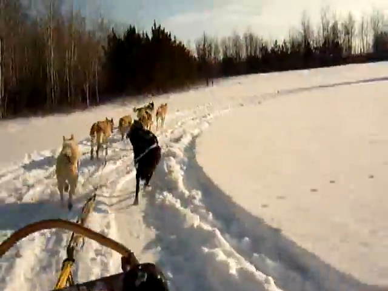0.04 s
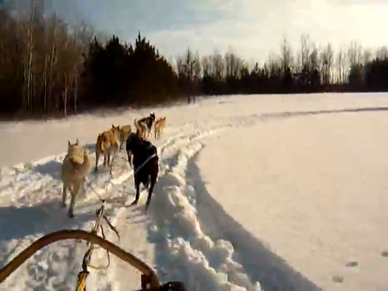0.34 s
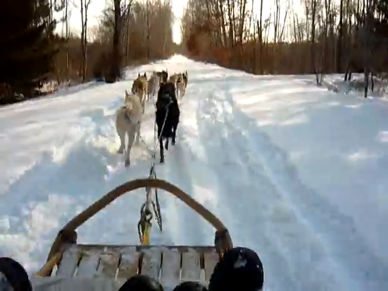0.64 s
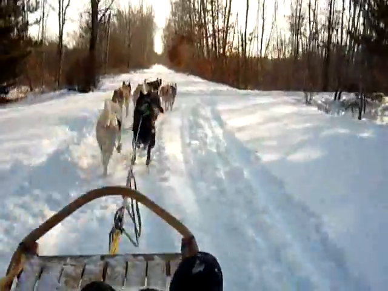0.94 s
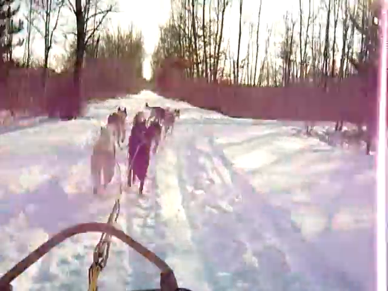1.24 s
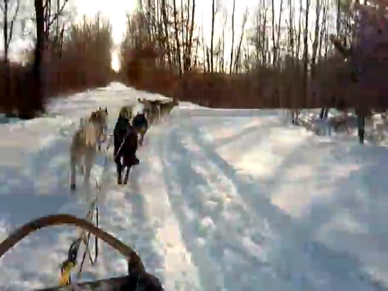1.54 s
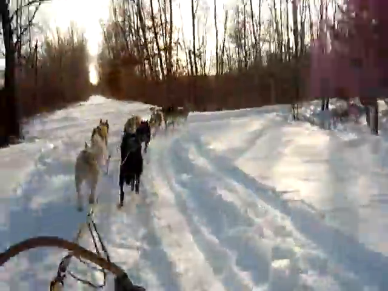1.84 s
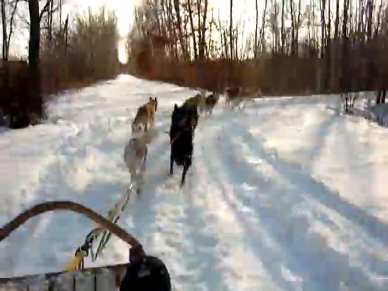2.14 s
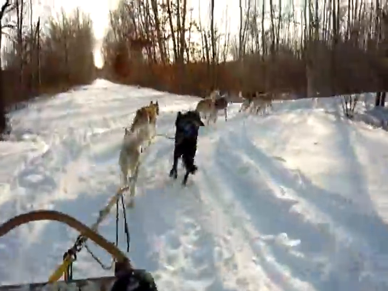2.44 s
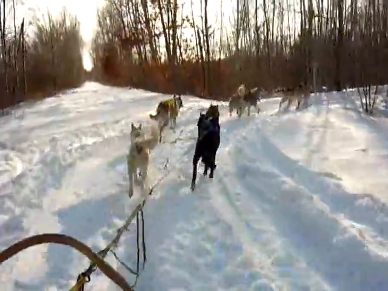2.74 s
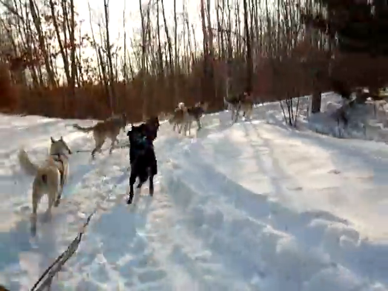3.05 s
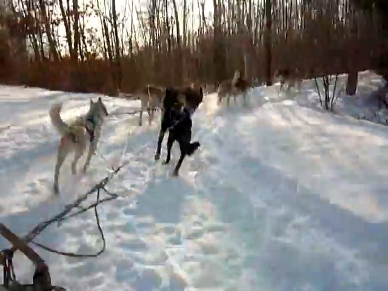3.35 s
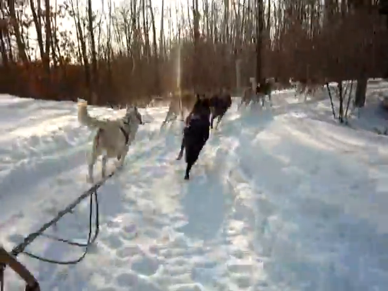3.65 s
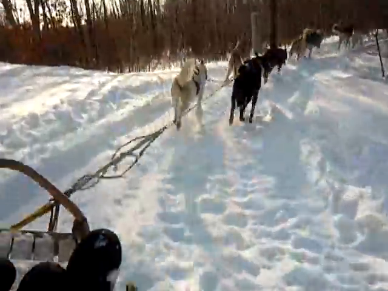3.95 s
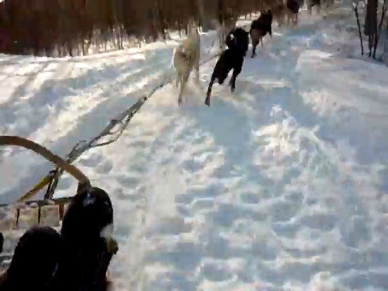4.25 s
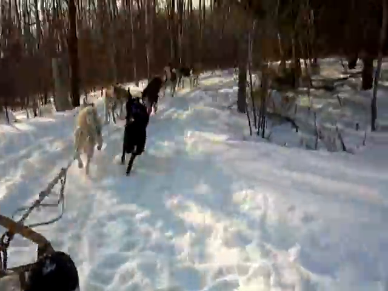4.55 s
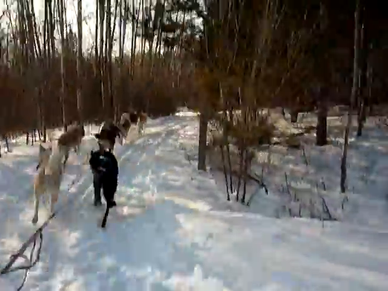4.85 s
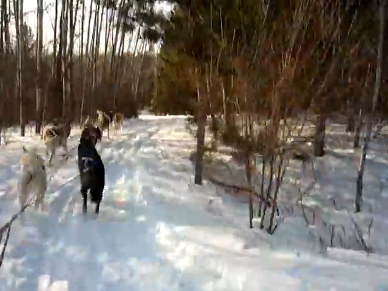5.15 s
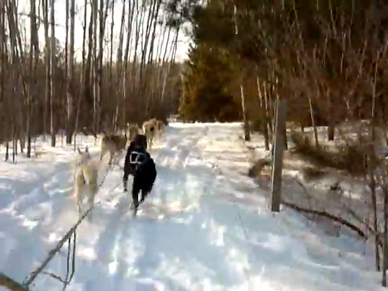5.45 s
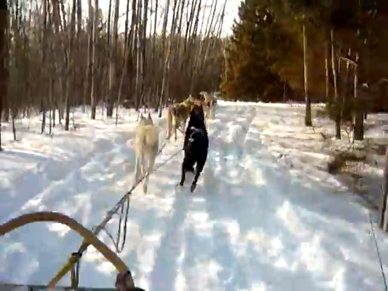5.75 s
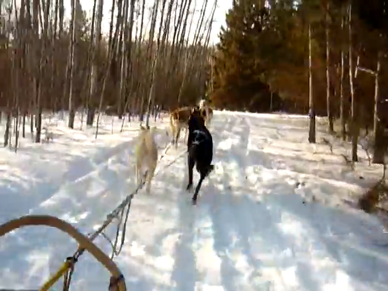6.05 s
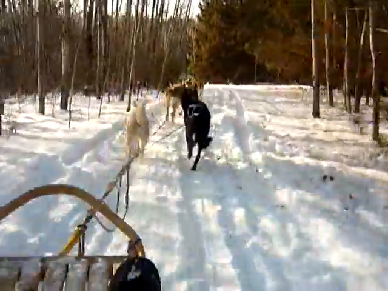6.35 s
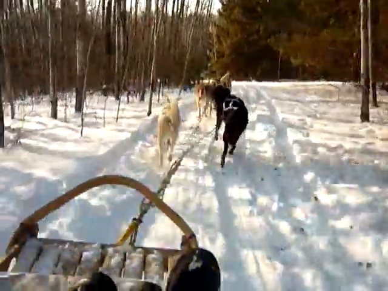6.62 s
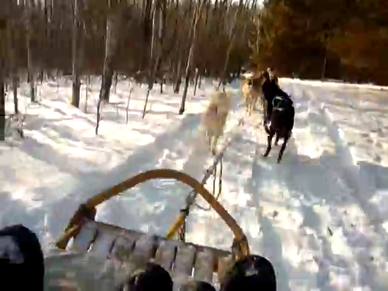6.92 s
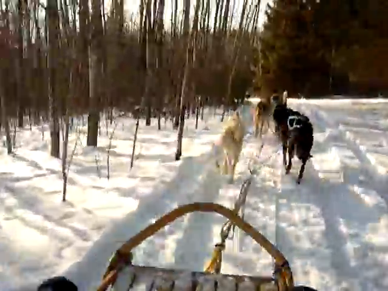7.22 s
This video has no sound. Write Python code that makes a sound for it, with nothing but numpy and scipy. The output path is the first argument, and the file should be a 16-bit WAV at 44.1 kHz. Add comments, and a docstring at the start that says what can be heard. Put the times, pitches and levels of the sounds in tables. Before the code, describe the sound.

Gusty wind buffets the microphone on a moving dog sled, with runners hissing on snow, bumps over ruts and one sharp click.

```python
"""Dog sled in a head wind

A sled runs along packed snow, heard from a small camera riding on it. Eddies sweep over the microphone:
slow air thumps and flutters, fast air tears and rasps, and gusts and lulls pass over a low rumble.
Underneath, the runners hiss and swish and the sled thuds over ruts.
One sharp click overloads the recorder."""
import sys
import numpy as np
from scipy import signal
from scipy.fft import rfft, irfft
from scipy.io import wavfile
from scipy.ndimage import uniform_filter1d, map_coordinates

SR = 44100
rng = np.random.default_rng(int(sys.argv[2]) if len(sys.argv) > 2 else 0)


def to_wav(sig):
    """Store sig (one row per channel, or 1-D mono) as 16-bit WAV at the path in sys.argv[1].

    Samples outside -1..1 are clipped; the rate is SR.
    """
    pcm = np.clip(np.atleast_2d(sig), -1, 1) * 32767
    pcm = np.round(pcm).astype(np.int16)
    wavfile.write(sys.argv[1], SR, pcm.T)  # frames by channels


N = 325458
TIME = np.arange(N) / SR

# tone of the microphone port: (frequency [Hz], gain [dB])
MIC_PORT = [(20, -27), (40, -27.5), (70, -19), (110, -7.5), (180, -0.5), (300, 2), (480, 1.44), (800, 1.43),
            (1300, 1.3), (2000, 0.73), (3000, 0.5), (5000, -6)]


def wind(surge_db=0.96, surge_hz=120, flutter_db=0.24, flutter_hz=60,
         wander_db=0.33, sway_db=0.39, drift_hz=12, trim_db=-0.12):
    """Turbulence on the microphone; brief surges make it brighter and louder together."""
    # bed of head wind: (time [s], level [dB], eddy rate [Hz])
    head_wind = [(0, -29, 100.1), (.27, -32.5, 62.21), (.42, -19.5, 165.5), (.66, -17.5, 145.1),
                 (.85, -18.5, 139.8), (.91, -18, 378.6), (1.45, -18.5, 267.5), (2.25, -17.5, 258.1),
                 (2.9, -18, 237.6), (3.4, -18, 289.8), (3.65, -17.5, 284.1), (3.9, -19, 345.3),
                 (4.45, -20.5, 285.1), (4.7, -20, 275.7), (5.55, -19, 234.7), (5.68, -18.5, 215),
                 (5.76, -19, 299.7), (6.05, -20, 280.4), (6.45, -19.5, 254.3), (6.85, -20.5, 194.9),
                 (7.1, -24.5, 165.2), (7.28, -19.5, 304.4)]
    # gusts, fast and bright or slow and heavy: (time [s], length [s], speed gain [dB], level gain [dB])
    gusts = [(.095, 0.052, -3, 10.5), (.182, 0.045, 3, 11.5), (.255, .05, -2, 11), (.33, 0.054, -3, 1),
             (.45, .07, 1.5, 3), (.915, 0.062, 2, -0.5), (1.25, 0.049, 2, 0), (1.65, .05, 2, -2),
             (1.76, 0.058, 1.5, -1), (1.95, 0.05, 2, 1.5), (2.26, .03, 2.5, 0), (2.36, .07, 2.5, 0),
             (2.79, 0.053, 2, -0.5), (3.058, .035, 5, -0.5), (3.335, .024, 4.5, 0),
             (3.95, 0.049, 3.5, -1.5), (4.2, 0.098, 3, 1.5), (4.315, 0.031, 4.5, -3), (4.68, .03, 4, 0.5),
             (4.94, 0.047, 2, 0.5), (5.3, 0.094, -1, 2.5), (5.385, 0.062, 2.5, 2.5), (5.437, .025, 4.5, -1),
             (5.765, 0.04, 5.5, -1), (5.832, .04, 4.5, -1.5), (5.99, 0.037, 2, 0), (6.33, 0.062, 2, -2),
             (6.42, 0.058, 2.5, 0), (6.565, 0.039, 3, -2), (6.76, 0.046, 1, -1), (6.9, 0.068, -1, 0),
             (7.163, 0.029, -1.5, 1), (7.34, 0.079, 1, -0.5)]
    # lulls where the air slackens: (time [s], length [s], speed loss [dB], level loss [dB])
    lulls = [(.135, 0.067, 0, 4), (.215, 0.03, 0, 0), (.565, .03, 3, -1), (.655, 0.053, 0, 3.5),
             (.715, 0.073, 6, 3.5), (1.315, 0.05, 2.5, 7), (1.89, 0.05, 4.5, -1), (2.108, 0.064, 10, -1.5),
             (2.232, 0.037, 4, -1.5), (2.68, .04, 4.5, 0.5), (3.01, 0.038, 1.5, 0.5),
             (3.245, 0.045, 4.5, 1), (3.515, 0.057, 3, 0.5), (3.775, 0.026, 1, 7.5),
             (4.005, 0.049, 8.5, -1), (4.05, .045, 4, 6), (4.1, .02, 4, 1.5), (4.283, 0.052, 6.5, -4.5),
             (4.352, 0.035, 6, 2), (4.517, 0.04, 6.5, 8), (4.76, .06, 1.5, -1), (4.855, 0.06, 3, -2),
             (5.02, 0.081, 3.5, -0.5), (5.115, 0.06, 6.5, 2.5), (5.175, 0.078, 3.5, 2.5),
             (5.58, 0.061, 3.5, -1.5), (5.65, 0.099, 3, 0), (5.792, 0.03, 4.5, 0), (5.915, 0.031, 2.5, 1),
             (6.14, .06, 2, 0), (6.21, 0.092, 8, 1), (6.485, 0.083, 4.5, -2), (6.6, 0.051, 2, 0),
             (6.715, 0.069, 6, 1.5), (6.835, 0.041, 2.5, 2.5), (7.015, 0.091, 3, 1.5),
             (7.085, 0.049, 2.5, 1), (7.192, 0.038, 7, 3)]
    level_db, eddy_hz = curves(head_wind)
    gust_speed_db, gust_db = swells(gusts)
    lull_speed_db, lull_db = swells(lulls)
    front_db = gust_fronts()
    surging_db = surge_db * walk(surge_hz)
    speed_db = gust_speed_db - lull_speed_db + .35 * front_db + surging_db + wander_db * walk(drift_hz)
    pressure = eddies(eddy_hz * undb(speed_db))
    pressure *= undb(surging_db + flutter_db * walk(flutter_hz))
    # even out the texture so that the gusts shape its loudness
    texture = steady(colour(pressure, MIC_PORT), even_s=0.026)
    strength_db = level_db + gust_db - lull_db + front_db + sway_db * walk(drift_hz)
    return texture * undb(strength_db + trim_db)


def eddies(eddy_hz, slope=0.44):
    """A frozen pattern of vortices blows past the port: the faster it passes, the brighter it sounds."""
    # vortices in the stream: (relative width, count per eddy period, level [dB])
    vortex_mix = [(1.624, 2.6, -2), (1.16, 1.5, -6.5), (0.61, .27, -19)]
    size, steps_per_period = 2 ** 18, 64
    wavenumber = np.fft.rfftfreq(size, 1 / steps_per_period)
    pattern = np.zeros(size)
    for width, density, db in vortex_mix:
        present = rng.random(size) < density / steps_per_period
        # a vortex gives a push, a pull or a swing, depending on how it passes
        cores = present * np.exp(2j * np.pi * rng.random(size))
        spectrum = rfft(cores.real) + 1j * rfft(cores.imag)
        # its smooth core rolls the highs off exponentially
        core_tone = wavenumber ** slope * np.exp(-wavenumber * width / 2)
        pattern += undb(db) * unit(irfft(spectrum * core_tone))
    travelled = np.cumsum(eddy_hz) * steps_per_period / SR
    return map_coordinates(pattern, [travelled % (size - 1)], order=3, mode="wrap")


def gust_fronts(stall_s=.015, rush_s=.012, overshoot=.5):
    """Swing of the wind in dB: the air stalls before each front, then snaps back and overshoots."""
    # gust fronts: (time [s], stall depth [dB])
    stalls = [(.893, 3.5), (1.934, 7), (2.72, 4.5), (2.921, 7.5), (3.159, 6), (3.327, 6), (3.474, 6),
              (3.733, 5), (3.788, 6), (4.111, 4.5), (4.305, 5.5), (4.533, 9), (4.609, 9.5), (4.876, 8),
              (5.471, 6), (5.886, 5), (6.315, 7.5), (6.486, 6), (6.55, 7), (6.745, 6), (7.227, 4)]
    swing_db = np.zeros(N)
    for s, depth_db in stalls:
        near = np.abs(TIME - s) < .1
        age = TIME[near] - s
        stall = -np.exp(-np.abs(age) / stall_s)
        rush = overshoot * np.exp(-np.abs(age) / rush_s)
        swing_db[near] += depth_db * np.where(age < 0, stall, rush)
    return uniform_filter1d(swing_db, size=64)


def buffets(gain_db=1.5):
    """Each strong eddy hits the microphone with one pressure swing: slow ones thump, fast ones crack."""
    # single strong eddies: (time [s], relative level [dB], eddy rate [Hz])
    hits = [(0.083, -14.5, 120.3), (0.098, -14, 109), (.185, -11, 171), (.333, -12.5, 95), (.405, 0, 199.5),
            (.423, -4, 171), (.431, -6.5, 159), (.551, -3.5, 199), (.586, -8, 210), (.595, -6.5, 250),
            (.626, -3, 156.5), (.666, -9.5, 191), (.722, -7, 138), (.760, -5.5, 211), (.781, -7.5, 290),
            (.816, -7.5, 236), (.863, -9, 190), (.885, -3.5, 327), (.975, -16.5, 700),
            (1.095, -10.5, 689.3), (1.290, -9.5, 600), (1.312, -9, 177.6), (1.366, -11, 750),
            (1.402, -9.5, 570), (1.468, -10, 478), (1.521, -14, 528.6), (1.573, -7, 388),
            (1.739, -9.5, 806), (1.803, -9.5, 800), (1.816, -5, 464.3), (1.867, -5.5, 430),
            (1.967, -15, 416.4), (2.070, -16.5, 420.3), (2.163, -12.5, 380), (2.203, -15.5, 647),
            (2.391, -4.5, 277), (2.515, -10.5, 630), (2.654, -9, 486), (2.706, -7.5, 500),
            (2.723, -7.5, 340), (2.882, -14.5, 690), (2.943, -17.5, 575.2), (3.067, -7, 544),
            (3.134, -12, 599), (3.16, -6, 431), (3.222, -9.5, 525), (3.272, -15.5, 801), (3.305, -7.5, 587),
            (3.333, -10, 520), (3.358, -9, 413), (3.400, -15, 467.3), (3.451, -3, 370), (3.638, -10, 433),
            (3.766, -10.5, 542), (3.801, -4.5, 433), (3.868, -13, 437), (3.936, -6, 493),
            (4.120, -5.5, 318.1), (4.143, -21, 779.7), (4.306, -5.5, 348.2), (4.610, -8.5, 199.5),
            (4.646, -15.5, 530), (4.692, -6, 584), (4.808, -8.5, 337), (4.861, -11.5, 450),
            (4.964, -9, 332), (5.302, -6, 243), (5.369, -12, 380.5), (5.433, -8, 485.1), (5.598, -11, 340),
            (5.686, -6, 226), (5.81, -4.5, 259), (5.832, -14.5, 800), (5.866, -7, 360), (5.888, -11.5, 370),
            (5.935, -8, 443.8), (5.99, -10, 401.8), (6.051, -8.5, 432), (6.094, -7, 492),
            (6.260, -11.5, 494.6), (6.377, -17.5, 480), (6.556, -12, 416), (6.675, -3.5, 220),
            (6.752, -6.5, 209), (6.773, -11, 230), (6.812, -8.5, 192), (6.87, -12.5, 534), (6.893, -7, 172),
            (6.935, -15.5, 350.1), (6.950, -18, 229), (6.968, -12.5, 310.6), (7.047, -14, 292),
            (7.122, -11, 180), (7.148, -11, 188), (7.166, -9, 340), (7.23, -7.5, 430), (7.302, -2, 414),
            (7.345, -7, 565)]
    pressure = np.zeros(N)
    for (s, db, eddy_hz), phase in zip(hits, rng.uniform(0, 2 * np.pi, len(hits))):
        near = np.abs(TIME - s) < .04
        distance = 2 * np.pi * eddy_hz * (TIME[near] - s)
        swing = np.real(np.exp(1j * phase) / (1 - 2j * distance) ** 1.21)
        pressure[near] += undb(db + gain_db) * swing
    return colour(pressure, MIC_PORT)


def rut_thuds(swell_s=0.0029):
    """Snow cushions each jolt over a rut, so the frame swells into a few swings and stops."""
    # low thuds and wooden knocks: (time [s], peak level [dB], pitch [Hz])
    jolts = [(0.088, -13.5, 150.4), (0.304, -14, 170), (.324, -9.5, 125), (.329, -20.5, 713),
             (.338, -32, 690), (.378, -17, 232), (0.429, -18, 270), (0.53, -18, 330), (.541, -13, 560),
             (.717, -8, 199.6), (.752, -10.5, 149.3), (0.81, -9, 209.1), (.859, -12, 205.3),
             (1.331, -6.5, 204.5), (1.365, -17, 148.1), (1.492, -14, 170), (1.923, -11, 199.1),
             (2.155, -10, 188), (2.226, -11, 197), (2.501, -12.5, 134.5), (2.52, -19, 280.6),
             (2.599, -15, 292), (3.645, -15, 290), (3.732, -14, 671), (4.011, -15, 616),
             (4.476, -13, 705.5), (5.055, -14, 278.5), (5.328, -16, 270), (5.515, -18.5, 140),
             (5.578, -13.5, 220.2), (5.652, -11, 280.9), (6.263, -12, 258.5), (6.318, -17, 290),
             (6.515, -11, 185.2), (6.550, -12.5, 678.5), (6.747, -12.5, 330.4), (6.795, -11, 297.8),
             (6.907, -8.5, 179.1), (6.944, -18, 189.8), (7.118, -12, 212.2), (7.161, -6, 225.4),
             (7.226, -7.5, 189.9)]
    track = np.zeros(N)
    age = np.arange(SR // 10) / SR
    envelope = age / swell_s * np.exp(1 - age / swell_s)
    for (s, db, hz), phase in zip(jolts, rng.uniform(0, 2 * np.pi, len(jolts))):
        start = int(s * SR)
        thud = undb(db) * envelope * np.sin(2 * np.pi * hz * age + phase)
        track[start:start + len(age)] += thud[:N - start]
    return track


def click(at_s=.5227, rise_s=0.0001):
    """A sharp click that the recorder clips, gone within a few milliseconds."""
    # brief ring of the click: (frequency [Hz], level [dB], decay [s])
    modes = [(89, 0.5, 0.0035), (330, 5, 0.00217), (490, 4.5, 0.0018), (732, 5, 0.0014),
             (1360, 9, 0.000525), (2260, -23, 0.0025)]
    age = np.maximum(TIME - at_s, 0)
    ring = sum(undb(db) * np.exp(-age / decay_s) * np.cos(2 * np.pi * hz * age)
               for hz, db, decay_s in modes)
    attack = 1 - np.exp(-age / rise_s)
    return -ring * attack


def camera_rumble(trim_db=-2.5):
    """Wind shakes the camera: a low, unbroken shudder under the gusts."""
    # strength of the shaking: (time [s], relative level [dB])
    shaking = [(0, -33), (.09, -24.5), (.24, -37), (.29, -26), (.33, -17), (.38, -25), (.42, -22),
               (.48, -38), (.52, -23), (.61, -30), (.69, -35), (.76, -25), (.84, -27), (.94, -38),
               (1.02, -31), (1.13, -42), (1.33, -28), (1.5, -24.5), (1.62, -34), (1.75, -39), (1.83, -31),
               (2.24, -29.5), (2.33, -41), (2.5, -30), (2.63, -39), (2.71, -25), (2.79, -37), (3.04, -28),
               (3.23, -31), (3.35, -44), (3.59, -28.5), (3.7, -33), (4.4, -38), (4.6, -32), (4.8, -39),
               (5.17, -38), (5.28, -27.5), (5.62, -38), (5.74, -36), (6.12, -42), (6.26, -30), (6.5, -35.5),
               (6.77, -30), (6.96, -29), (7.07, -39), (7.16, -27), (7.38, -40)]
    # tone of the shudder: (frequency [Hz], gain [dB])
    bass_tone = [(20, -15.5), (45, -12), (70, -3), (100, 0), (130, 0.5), (170, -16.5), (300, -48.5)]
    level_db, = curves(shaking)
    shudder = steady(colour(rng.standard_normal(N), bass_tone), even_s=.04)
    return shudder * undb(level_db + trim_db)


def runners(grains_per_s=700, crunch=0.87, uneven_db=0.76, uneven_hz=20, frame_db=5):
    """Snow crystals crush under the runners in a dense hiss, and the frame rumbles along."""
    # glide of the runners: (time [s], level [dB])
    glide = [(0, -42.5), (.3, -43), (.45, -43), (.65, -40.5), (.85, -42), (1.4, -42.5), (1.8, -40),
             (2.1, -43.5), (3, -40.5), (4, -46), (5.3, -43.5), (7.38, -43.5)]
    # swishes of loose snow: (time [s], length [s], gain [dB])
    swishes = [(.035, 0.065, 4.5), (.16, 0.099, 5), (.32, .08, 4.5), (.725, .1, 3.5), (.925, 0.036, 8),
               (1.25, 0.061, 4), (3.34, .05, 4), (3.655, 0.039, 12), (3.8, .05, 7), (3.94, 0.039, 2)]
    # tone of the snow hiss: (frequency [Hz], gain [dB])
    snow_tone = [(300, 5), (800, 11), (1400, 3.5), (2100, -0.5), (2900, -1.5), (3600, 1), (4400, -3.5),
                 (5200, -11), (7000, -40)]
    # tone of the sled frame: (frequency [Hz], gain [dB])
    frame_tone = [(25, -19.5), (60, -13.5), (130, -9), (260, -2), (500, 2), (1000, -17), (2000, -47.5)]
    level_db, = curves(glide)
    swish_db, = swells(swishes)
    grains = (rng.random(N) < grains_per_s / SR) * rng.standard_normal(N)
    hiss = unit(colour(rng.standard_normal(N) + crunch * unit(grains), snow_tone))
    frame = unit(colour(rng.standard_normal(N), frame_tone))
    hiss *= undb(swish_db + uneven_db * walk(uneven_hz))
    return (hiss + frame * undb(frame_db)) * undb(level_db)


def undb(db):
    """Decibels to gain."""
    return 10 ** (np.asarray(db) / 20)


def unit(x):
    """Scale to rms 1."""
    return x / np.sqrt(np.mean(x ** 2))


def steady(x, even_s):
    """Ride the rms towards 1 over stretches of even_s, keeping the fine flutter."""
    size = max(int(even_s * SR), 64)
    power = uniform_filter1d(uniform_filter1d(x ** 2, size), size)
    return x / np.sqrt(np.abs(power) + 1e-18)


def curves(table):
    """Straight-line automation from rows of (time [s], values), one curve per value column."""
    s, *columns = np.transpose(table)
    return [np.interp(TIME, s, column) for column in columns]


def swells(table, edge=2.4):
    """Smooth bells from rows of (time [s], length [s], heights [dB]), one curve per height column."""
    return sum(np.outer(heights_db, np.exp(-(edge * (TIME - s) / length_s) ** 2))
               for s, length_s, *heights_db in table)


def colour(x, points):
    """Equalise along a curve of (frequency [Hz], gain [dB]) points."""
    hz, db = np.transpose(points)
    bin_hz = np.maximum(np.fft.rfftfreq(N, 1 / SR), 1)
    gain_db = np.interp(np.log(bin_hz), np.log(hz), db)
    return irfft(rfft(x) * undb(gain_db), N)


def walk(rate_hz):
    """Smooth random drift of rms 1, rolled off above rate_hz."""
    bin_hz = np.fft.rfftfreq(N, 1 / SR)
    return unit(irfft(rfft(rng.standard_normal(N)) / (1 + (bin_hz / rate_hz) ** 2), N))


def scene(headroom=.72, band_hz=4800):
    """The microphone rounds off strong gusts and passes a narrow band; only the click is full of treble."""
    # treble loss of the microphone: (frequency [Hz], gain [dB])
    treble_loss = [(1800, 0), (2600, -1), (3200, -5), (3700, -10), (4300, -15.5), (5000, -21)]
    outdoors = wind() + camera_rumble() + buffets() + rut_thuds() + runners()
    saturated = headroom * np.tanh(outdoors / headroom)
    lowpass = signal.ellip(8, .5, 70, band_hz, fs=SR, output="sos")
    muffled = signal.sosfilt(lowpass, colour(saturated, treble_loss))
    return (muffled + click())[None]


def record(dry, ceiling=.69, top_hz=16500):
    """The recorder clips the tallest peaks, dulls the highest treble and cuts the top."""
    # top-end roll-off of the recorder: (frequency [Hz], gain [dB])
    top_rolloff = [(5000, 0), (8000, -3), (12000, -0.5), (12700, -17.5), (16500, -28)]
    clipped = np.clip(dry, -ceiling, ceiling)
    lowpass = signal.ellip(8, .2, 70, top_hz, fs=SR, output="sos")
    return signal.sosfilt(lowpass, colour(clipped, top_rolloff))


dry = scene()
out = record(dry)
to_wav(out)
```